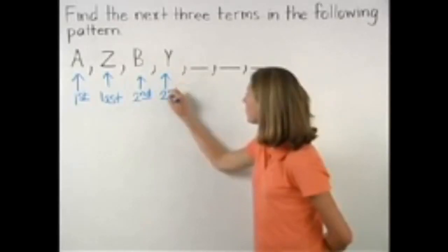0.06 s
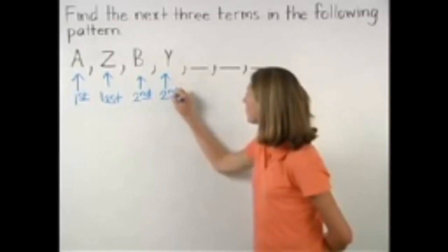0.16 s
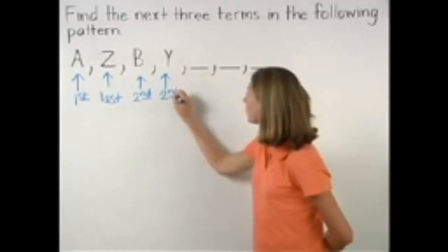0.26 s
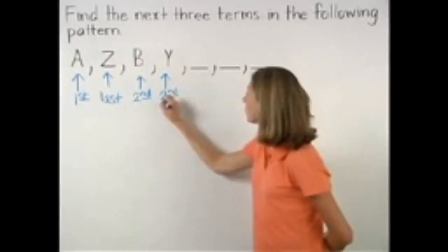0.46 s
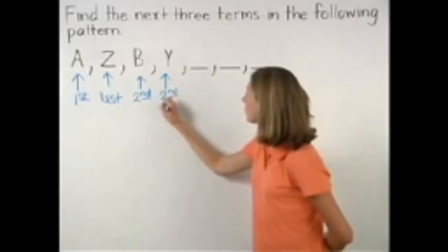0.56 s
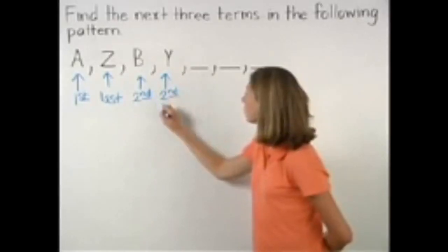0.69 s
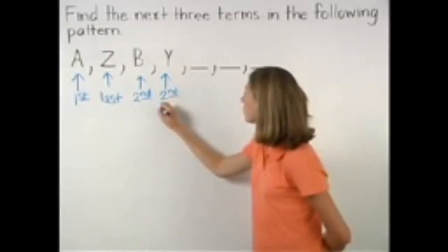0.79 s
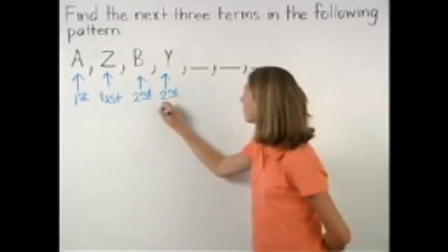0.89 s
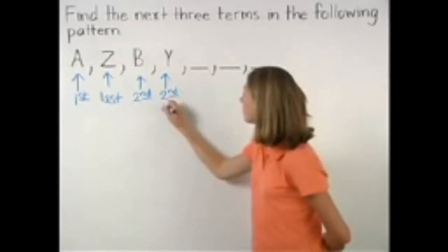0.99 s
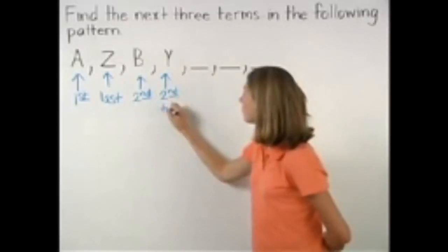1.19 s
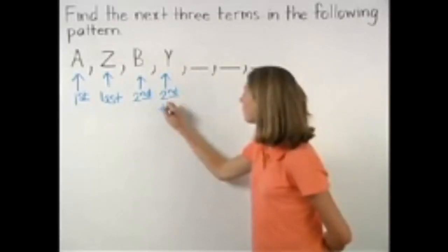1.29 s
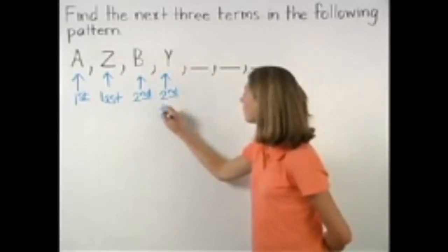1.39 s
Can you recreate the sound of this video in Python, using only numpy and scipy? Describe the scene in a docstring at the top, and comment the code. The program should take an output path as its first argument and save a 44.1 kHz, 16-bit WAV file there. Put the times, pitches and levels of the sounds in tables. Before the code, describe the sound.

A felt marker writes on a whiteboard, soft hollow taps and brief hisses in a quiet room

```python
"""Marker on a whiteboard

A felt marker writes small letters on a wall-hung whiteboard in a quiet room.
Three times the tip lands: decaying panel modes and noise bursts make a thud with a faint tick.
Along six short strokes the felt hisses, as random tiny clicks ring resonances of pen and panel.
Shaped noise gives low room rumble and microphone hiss; a wandering sine adds a low hum."""
import sys
import numpy as np
from scipy import signal
from scipy.fft import rfft, irfft
from scipy.io import wavfile

SR = 44100
rng = np.random.default_rng(int(sys.argv[2]) if len(sys.argv) > 2 else 0)


def persist_wave(psi):
    """Save psi, clipped to +-1, as 16-bit WAV."""
    counts = np.round(np.clip(psi, -1, 1) * 32767).astype(np.int16)
    wavfile.write(sys.argv[1], SR, np.atleast_2d(counts).T)


N = 63945  # length in samples

# Landings of the tip: [t/s, strength/dB, contact cut-off f/Hz, drive of the high modes/dB, tick level/dB]
TIP_LANDINGS = [(0.0507, -30, 420, 10, -68.5), (0.5105, -31.5, 340, 3, -64.5), (0.8295, -32, 604, 8, -62)]
# Bending modes of the panel: [f/Hz, level/dB, t60/s, polarity (sign only; all flipped in the mix)]
PANEL_MODES = [(88, -1, .36, -1), (105, -6, .3, -1), (124, 2, .19, 1), (145, 5, .11, 1),
               (173, -16, .25, -1), (197, 8, .095, 1), (210, -9, .2, -1), (241, -7, .22, 1),
               (266, -17, .18, 1), (287, -7, .18, 1), (325, -6, .14, -1), (358, -10, .14, 1),
               (392, -11, .17, -1), (412, -13, .1, -1), (460, -6, .13, -1), (499, -8, .13, -1),
               (548, -8, .14, -1), (603, -13, .13, 1), (642, -9, .12, -1), (772, -17, .12, -1),
               (1075, -19, .09, 1), (1230, -19, .08, -1), (1400, -24, .08, 1)]
# Pen strokes: [t/s, rise/s, hold/s, fall/s, level/dB, brightness/(dB per octave),
#               barrel ring/dB, drive of the panel/dB]
PEN_STROKES = [(0.025, 0.036, 0.1, 0.056, -65.5, -1.5, -4, -5),
               (0.509, 0.038, 0.08, 0.055, -66.5, -1, 0.5, -1),
               (0.85, 0.016, 0.057, 0.11, -71, 3, 0.5, -8.5), (1.018, 0.037, 0.072, 0.13, -68, -5, 1, -3),
               (1.166, 0.042, 0.046, 0.011, -65, -2, 2, -1),
               (1.245, 0.029, 0.038, 0.03, -65.5, -0.5, -2.5, -3.5)]
# Resonances of tip and barrel: [f/Hz, width/Hz, level/dB]
PEN_RESONANCES = [(2854, 240, -8), (3366, 88, -3.5), (3843, 440, -4), (4400, 390, 1), (5510, 1290, -4.5),
                  (5904, 120, 4.5), (6280, 130, -3), (6490, 235, 1), (7540, 1500, -7.5), (10400, 340, -9.5)]
# Panel resonances under the rubbing: [f/Hz, width/Hz, level/dB]
RUBBED_PANEL = [(699, 83, 0), (1054, 160, -2), (1616, 240, -6.5), (1963, 103, -1)]
# Spectrum of room rumble and hiss: [f/Hz, relative level per Hz/dB]
FLOOR_SPECTRUM = [(20, -26), (32, -29), (40, -15.5), (52, -4.5), (72, -6), (110, -3.5), (150, -10),
                  (200, -17), (300, -31), (600, -32.5), (2000, -36.5), (5000, -36.5), (9500, -38),
                  (10400, -36), (11500, -37.5), (15000, -39.5)]

# Thuds
SPOT_SPREAD_DB = 0.8  # each landing spot excites the modes a little differently
HIGH_MODES_HZ, RADIATES_ABOVE_HZ = 900, 130
RATTLE_DB, RATTLE_T60_S, RATTLE_RISE_S, RATTLE_BAND_HZ = -14, 0.25, 0.0029, [345, 718]
KNOCK_DB, KNOCK_T60_S, KNOCK_BAND_HZ = -17, 0.14, [990, 1870]  # dense high modes
TICK_T60_S, TICK_BAND_HZ = 0.069, [2550, 6500]
KNOCK_AND_TICK_RISE_S = 0.0038
# Strokes
SLIPS_PER_S, SLIP_SPREAD_DB = 9000, 2
GRIP_WAVER_DB, GRIP_WAVER_HZ = 1.5, 12
PEN_CENTRE_HZ, BARREL_BELOW_HZ = 5000, 4800
# Background and recording
FLOOR_DB = -60
HUM_HZ, HUM_SPREAD_HZ, HUM_DB, HUM_WAVER_DB = 52, 3.7, -65.5, 5.5
OFFSET, CUTOFF_HZ = -0.0003, 15050


def amp(db):
    """Decibels to gain."""
    return 10 ** (np.asarray(db) / 20)


def rms_one(x):
    """Scale to rms 1."""
    return x / np.sqrt(np.mean(x ** 2) + 1e-20)


def butter(x, hz, kind, order=2):
    """Butterworth filter."""
    return signal.sosfilt(signal.butter(order, hz, kind, fs=SR, output="sos"), x)


def drift(hz):
    """Slow random wander of rms 1, from noise low-passed after a second of run-in."""
    return rms_one(butter(rng.standard_normal(N + SR), hz, "low")[SR:])


def resonance(x, hz, width_hz):
    """Two-pole peak; white noise keeps its level per Hz at the top."""
    r = np.exp(-np.pi * width_hz / SR)
    feedback = [1, -2 * r * np.cos(2 * np.pi * hz / SR), r * r]
    return signal.lfilter([(1 - r * r) / 2, 0, (r * r - 1) / 2], feedback, x)


def burst(noise, band_hz, db, age, t60, rise, order=2):
    """Band of noise that swells softly, then dies away exponentially."""
    band = rms_one(butter(noise, band_hz, "band", order=order))
    return amp(db - 60 * age / t60) * (1 - np.exp(-age / rise)) * band


def panel_ring(age, high_db, spot):
    """Sum of decaying sines, one per bending mode, with levels set by the landing spot."""
    ring = np.zeros(N)
    for (hz, level_db, t60, polarity), z in zip(PANEL_MODES, spot):
        db = level_db + high_db * (hz > HIGH_MODES_HZ) + SPOT_SPREAD_DB * z
        ring += np.sign(polarity) * amp(db - 60 * age / t60) * np.sin(2 * np.pi * hz * age)
    return ring


def thuds():
    """A soft push rings every panel mode; dense small modes and the tick of the tip die away with it."""
    out, t = np.zeros(N), np.arange(N) / SR
    spots = rng.standard_normal((len(TIP_LANDINGS), len(PANEL_MODES)))
    for (start, db, soft_hz, high_db, tick_db), spot in zip(TIP_LANDINGS, spots):
        age = np.maximum(t - start, 0)
        modes = panel_ring(age, high_db, spot)
        noise = rng.standard_normal(N)
        rattle = burst(noise, RATTLE_BAND_HZ, RATTLE_DB, age, RATTLE_T60_S, RATTLE_RISE_S, order=3)
        knock = burst(noise, KNOCK_BAND_HZ, KNOCK_DB + high_db, age, KNOCK_T60_S, KNOCK_AND_TICK_RISE_S)
        tick = burst(noise, TICK_BAND_HZ, tick_db, age, TICK_T60_S, KNOCK_AND_TICK_RISE_S)
        # the soft contact dulls the body of the thud; the tick bypasses it
        out += butter(amp(db) * (rattle + knock - modes), soft_hz, "low") + tick
    return butter(out, RADIATES_ABOVE_HZ, "high", order=4)


def strokes():
    """Felt fibres slip in dense clicks that ring pen and duller panel; the grip wavers the pen peaks."""
    t = np.arange(N) / SR
    slip_now = rng.random(N) < SLIPS_PER_S / SR
    slips = slip_now * rng.choice([-1, 1], N) * amp(SLIP_SPREAD_DB * rng.exponential(1, N))

    # neighbouring resonances alternate in polarity
    pen = []
    for k, (hz, width_hz, db) in enumerate(PEN_RESONANCES):
        gain = amp(db + GRIP_WAVER_DB * drift(GRIP_WAVER_HZ))
        pen.append((-1) ** k * gain * resonance(slips, hz, width_hz))
    panel = np.zeros(N)
    for k, (hz, width_hz, db) in enumerate(RUBBED_PANEL):
        panel += (-1) ** k * amp(db) * resonance(slips, hz, width_hz)

    scale, out = np.std(sum(pen)), np.zeros(N)
    for start, rise, hold, fall, db, bright_db, barrel_db, panel_db in PEN_STROKES:
        speed = np.interp(t, np.cumsum([start, rise, hold, fall]), [0, 1, 1, 0])
        hiss = np.zeros(N)
        for (hz, _, _), ring in zip(PEN_RESONANCES, pen):
            tilt_db = bright_db * np.log2(hz / PEN_CENTRE_HZ)
            hiss += amp(tilt_db + barrel_db * (hz < BARREL_BELOW_HZ)) * ring
        out += amp(db) * speed * (hiss + amp(panel_db) * panel) / scale
    return out


def room_floor():
    """Noise shaped by the floor spectrum, and a low hum that wanders in pitch and level."""
    hz = np.maximum(np.arange(N // 2 + 1) * SR / N, 1)
    points = np.array(FLOOR_SPECTRUM)
    shape = amp(np.interp(np.log(hz), np.log(points[:, 0]), points[:, 1]))
    noise = amp(FLOOR_DB) * rms_one(irfft(rfft(rng.standard_normal(N)) * shape, N))
    phase = 2 * np.pi * np.cumsum(HUM_HZ + HUM_SPREAD_HZ * drift(5.5)) / SR
    hum_gain = amp(HUM_DB + HUM_WAVER_DB * drift(2.2))
    return noise + hum_gain * np.sqrt(2) * np.sin(phase)


def scene():
    """Thuds, strokes and floor in one channel."""
    return (thuds() + strokes() + room_floor())[None]


def record(dry):
    """Add a small steady offset and cut the top steeply with an elliptic low-pass."""
    steep_cut = signal.ellip(14, 0.3, 45, CUTOFF_HZ, fs=SR, output="sos")
    return signal.sosfilt(steep_cut, dry + OFFSET)


dry = scene()
out = record(dry)
persist_wave(out)
```